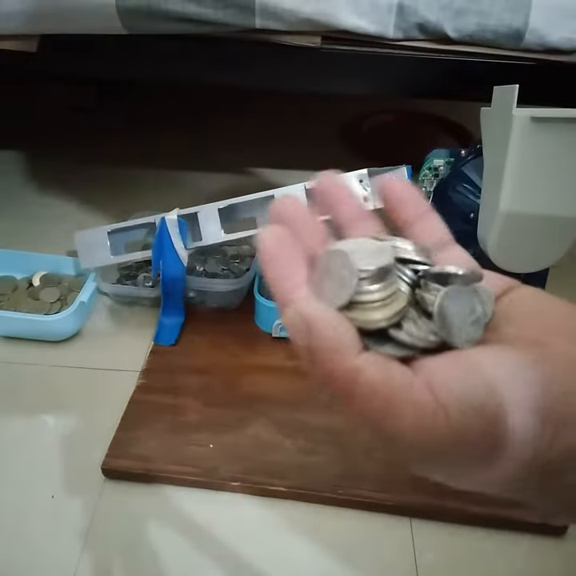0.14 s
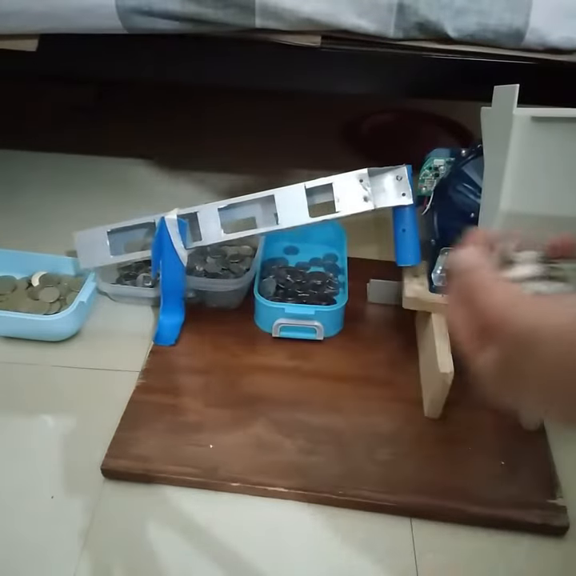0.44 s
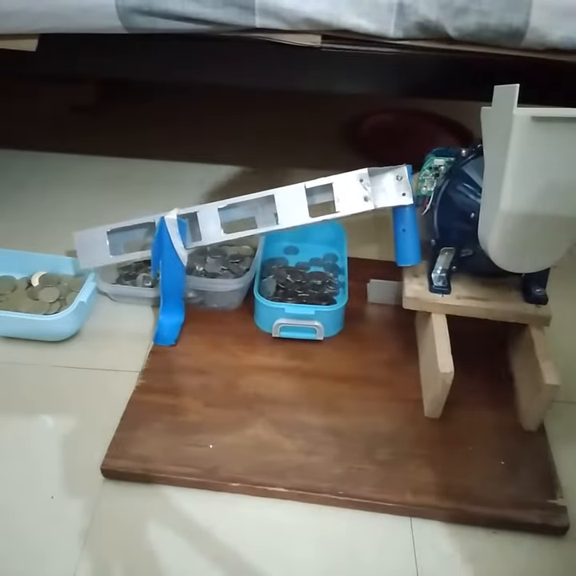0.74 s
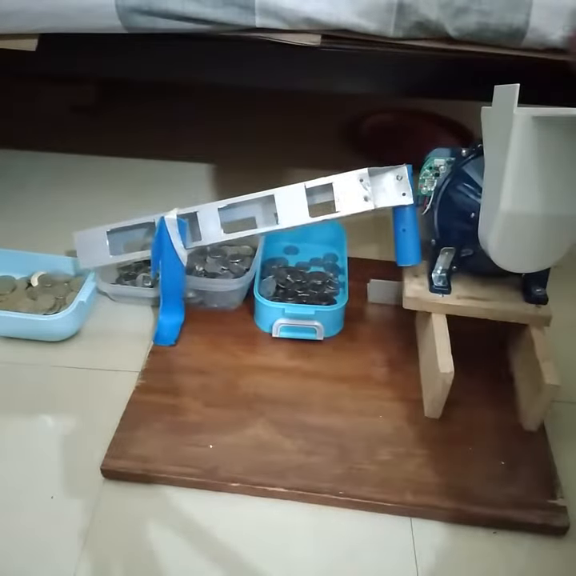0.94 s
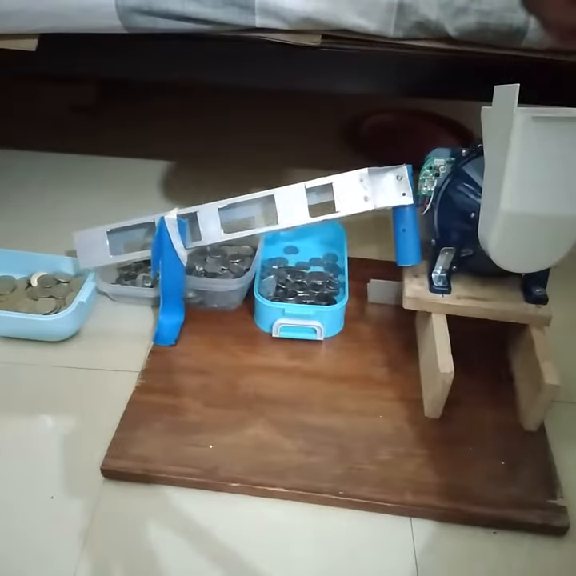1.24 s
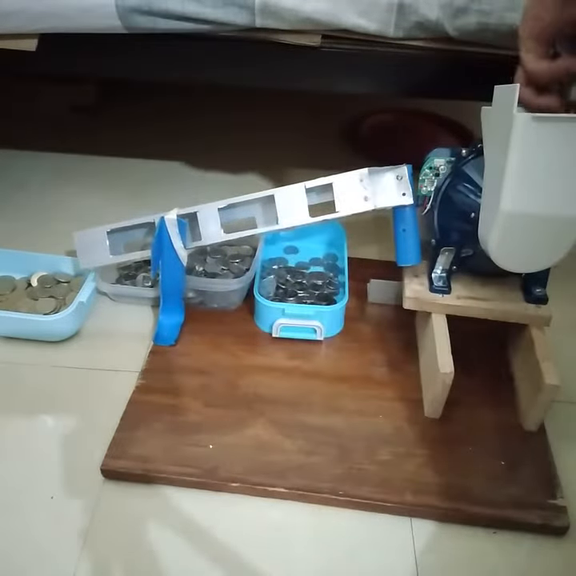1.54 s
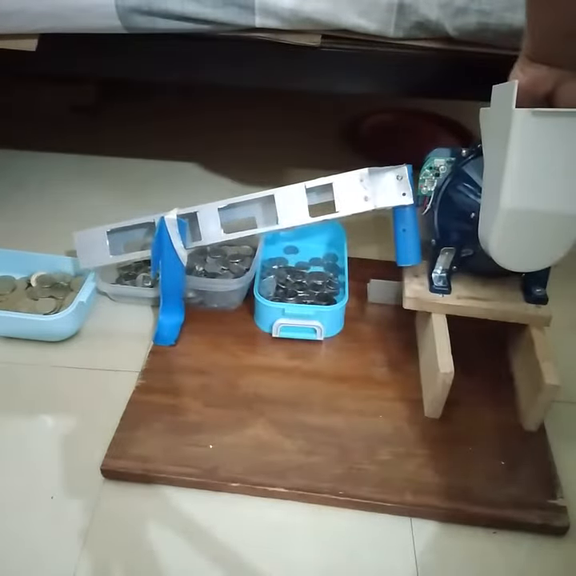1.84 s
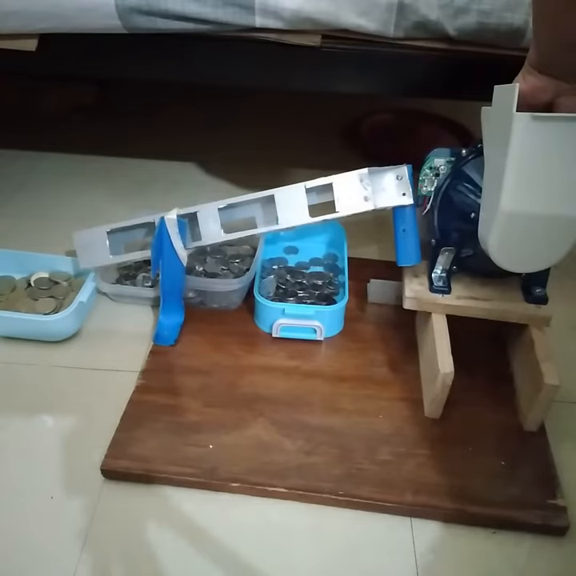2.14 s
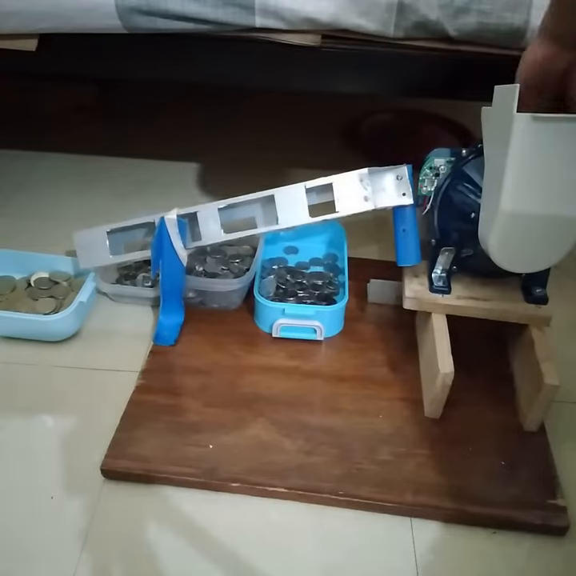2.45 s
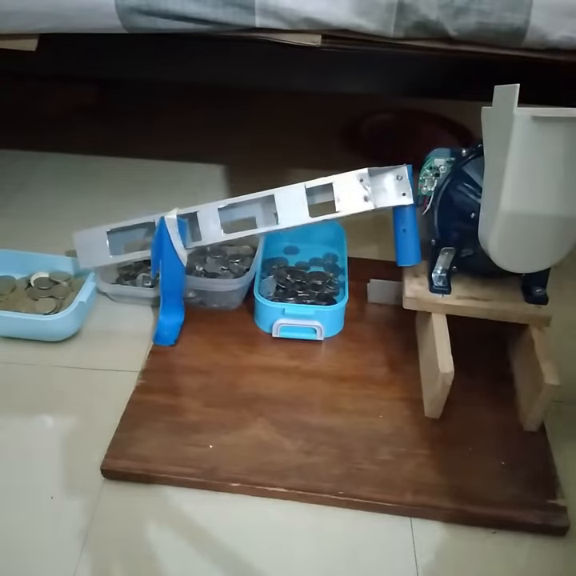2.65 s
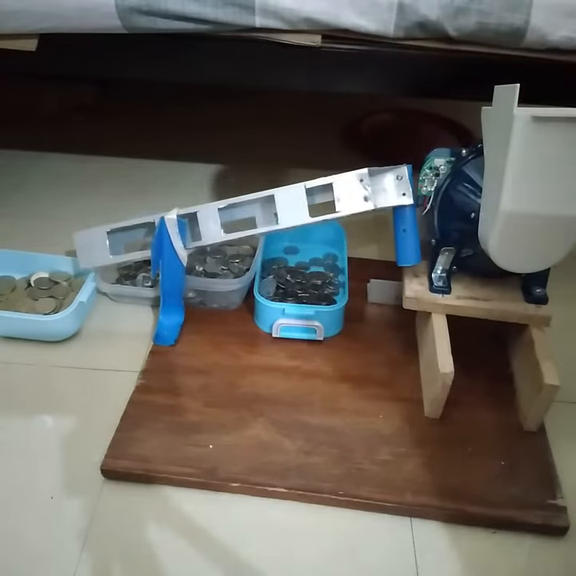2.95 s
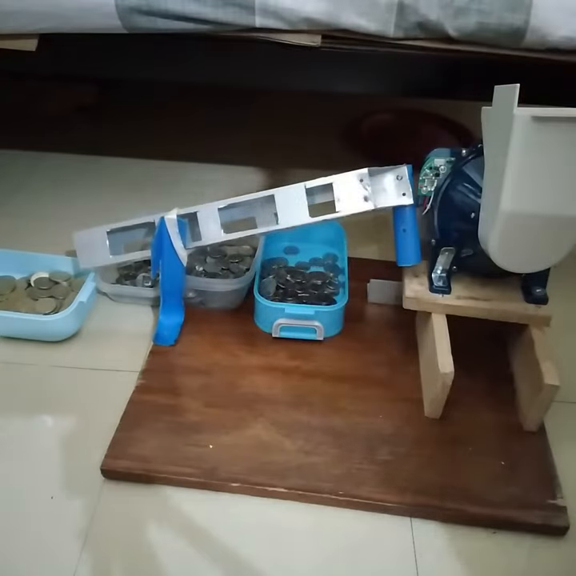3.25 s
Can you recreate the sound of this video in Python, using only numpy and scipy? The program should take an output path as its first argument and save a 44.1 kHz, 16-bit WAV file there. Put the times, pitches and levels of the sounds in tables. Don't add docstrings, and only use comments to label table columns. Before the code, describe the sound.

A motorised coin sorter clatters: coins tumble on its turning disc, knocking the plastic housing irregularly, busiest around 0.6-1.0 s, while a handful chinks brightly in a palm at about 0.8. Sparser clacks continue to 1.7. From 1.9 coins pour into the hopper, booming hollow at first, surging near 2.2 and again about 3.05, harshly clipped with rumble, ringing metal above a faint wavering gear whir, slight tiled-room echo.

```python
import sys
import numpy as np
from scipy import signal
from scipy.fft import rfft, irfft, next_fast_len
from scipy.io import wavfile
from scipy.ndimage import uniform_filter1d, map_coordinates

SR = 44100
rng = np.random.default_rng(int(sys.argv[2]) if len(sys.argv) > 2 else 0)


def attenuation_scalar(level_db):
    decades = np.asarray(level_db, float) / 20
    return 10 ** decades


def digitize_waveform(pressure):
    field = np.atleast_2d(pressure).T
    bounded = np.clip(field, -1, 1)
    quanta = np.round(bounded * 32767).astype(np.int16)
    wavfile.write(sys.argv[1], SR, quanta)


N = 149499
WIDE = 2 * next_fast_len(N // 2 + 4096)

# (frequency [Hz], level per Hz [dB])
METAL = [(1200, -30.5), (2000, -5), (3400, -0.5), (7700, -8.5), (11000, -13.5), (12500, -16), (15700, -37)]
# (frequency [Hz], width [Hz], level over the spectrum [dB])
COINS = [(4590, 610, 5), (7450, 1150, 6), (10380, 210, 9.5), (13500, 470, -5), (15300, 330, 12)]


def unit(x):
    return x / np.sqrt(np.mean(x ** 2) + 1e-20)


def along(points, hz):
    f, v = np.transpose(points)
    return np.interp(np.log(hz + 1), np.log(f + 1), v)


def curve(rows, before=None, after=None):
    times, values = np.transpose(rows)
    return np.interp(np.arange(N) / SR, times, values, before, after)


def wobble(rate):
    knots = rng.standard_normal(int(N * rate / SR) + 4)
    return map_coordinates(knots, [np.arange(N) * rate / SR])


def coloured(x, spectrum, peaks=()):
    hz = np.fft.rfftfreq(WIDE, 1 / SR)
    gain = attenuation_scalar(np.clip(along(spectrum, hz), -90, 20))
    for centre, width, db in peaks:
        gain = gain * np.sqrt(1 + (attenuation_scalar(2 * db) - 1) / (1 + ((hz - centre) * 2 / width) ** 2))
    cepstrum = irfft(np.log(unit(gain)), WIDE)
    cepstrum[1:WIDE // 2] *= 2
    cepstrum[WIDE // 2 + 1:] = 0
    return irfft(rfft(x, WIDE) * np.exp(rfft(cepstrum)), WIDE)[..., :N]


def pair():
    # (frequency [Hz], left-right likeness)
    alike = [(60, 0.81), (500, 0.74), (1500, 0.65), (4000, 0.012)]
    likeness = along(alike, np.fft.rfftfreq(WIDE, 1 / SR))
    turn = np.arccos(np.clip(likeness, -1, 1)) / 2
    mid, side = rfft(rng.standard_normal((2, WIDE))) * [np.cos(turn), np.sin(turn)]
    return irfft(np.array([mid + side, mid - side]), WIDE)[:, :N]


def bursts(times, dbs, ms, rise_ms=0.013):
    at = np.clip(np.asarray(times) * SR, 0, N - 1).astype(int)
    power = np.bincount(at, attenuation_scalar(2 * np.asarray(dbs)), N)
    keep = np.exp(-1000 / (abs(rise_ms) * SR))
    power = signal.lfilter([1 - keep], [1, -keep], power)
    power = signal.lfilter([1], [1, -np.exp(-2000 / (ms * SR))], power)
    return np.sqrt(np.abs(power)) * pair()


def rattle(per_s, spread_db, ms, count):
    draw = rng.random((count, 2))
    times = np.cumsum(-np.log(1 - draw[:, 0])) / per_s
    size_db = np.minimum(-spread_db * np.log(1 - draw[:, 1]), 8)
    inside = times < N / SR
    return unit(bursts(times[inside], size_db[inside], ms))


def damped(times, hz, t60, gains, size):
    t = np.arange(size) / SR
    decay = attenuation_scalar(-60 * t / np.reshape(t60, (-1, 1)))
    wave = np.sin(2 * np.pi * np.outer(hz, t)) * decay * (1 - np.exp(-t / 0.00059))
    at = (np.asarray(times) * SR).astype(int)[:, None] + np.arange(size)
    return np.array([np.bincount(at.ravel(), (wave * g[:, None]).ravel(), N + size)[:N] for g in gains])


def rings(count):
    draw, side = rng.random((count, 3)), rng.standard_normal((count, 2))
    times = np.cumsum(-np.log(1 - draw[:, 0])) / 1200
    hz = 500 + 15000 * draw[:, 1] ** 1.6
    t60 = np.minimum(70 / hz, .05)
    placed = (attenuation_scalar(2.5 * draw[:, 2])[:, None] * (side + [.8, .8])).T
    whitening = np.sqrt(hz) * (hz - 400) ** 0.48
    gains = placed * (times < N / SR) * whitening
    return unit(damped(np.minimum(times, N / SR), hz, t60, gains, size=400))


def blows(rows, spectrum, peaks, trim_db=0):
    s, db, metal_db = np.transpose(rows)[:3]
    knock = coloured(bursts(s, db - 5 + trim_db, ms=6.3, rise_ms=.8), spectrum, peaks)
    chink = coloured(bursts(s, db + metal_db - 4.5, ms=13.7), METAL, COINS)
    return knock + chink


def room(x):
    # (frequency [Hz], t60 [s])
    reverb_t60 = [(200, 0.49), (2000, 0.56), (12000, 0.18)]
    hz, t, z = signal.stft(rng.standard_normal((2, SR // 2)), SR, nperseg=256)
    tail = signal.istft(z * attenuation_scalar(-60 * t / along(reverb_t60, hz)[:, None]), SR, nperseg=256)[1]
    delayed = np.pad(x, ((0, 0), (250, 0)))
    return signal.fftconvolve(delayed, tail / np.linalg.norm(tail[0]), axes=1)[:, :N]


def shimmer(x):
    # (frequency [Hz], scatter [dB])
    scatter = [(10000, 1.5), (13000, 4)]
    hz, _, z = signal.stft(x, SR, nperseg=512)
    field = uniform_filter1d(rng.standard_normal(z.shape[1:]), size=6, axis=0)
    field = uniform_filter1d(field, size=9, axis=1)
    return signal.istft(z * attenuation_scalar(along(scatter, hz)[:, None] * unit(field)), SR, nperseg=512)[1][:, :N]


def motor():
    # (multiple of the tooth rate, level under load [dB])
    gear = [(1, -40), (1.57, -42), (2, -45), (3, -35), (5, -38)]
    # (time [s], level [dB])
    load = [
        (1.8, -11),
        (2.4, 0),
    ]
    # (frequency [Hz], level per Hz [dB])
    hum = [(12, -24), (20, -4.5), (144, -16), (811, -8.5), (2030, 3), (2270, 0), (6020, -23), (6910, -11),
           (15500, -30)]
    # (frequency [Hz], width [Hz], level [dB])
    stand = [(346, 5.5, 7)]
    gear_hz, waver, flutter_hz = 409.1, .003, 18
    phase = 2 * np.pi * np.cumsum(gear_hz * (1 + waver * wobble(29.9))) / SR
    tones = 0
    for multiple, db in gear:
        flutter = 1 + .5 * wobble(flutter_hz)
        tones = tones + attenuation_scalar(db) * flutter * np.sin(multiple * phase + rng.uniform(0, 1.02, (2, 1)))
    return attenuation_scalar(curve(load)) * tones + attenuation_scalar(-30 + wobble(7.56)) * coloured(pair(), hum, stand)


def free_coins():
    # (time [s], frequency [Hz], level [dB], t60 [s])
    ringing = [
        (.815, 13500, -21, 0.38),
        (0.935, 13340, -35, 0.36),
        (1.032, 4770, -20.5, .09),
        (1.812, 13600, -27, 0.33),
        (1.96, 15000, -32, 0.55),
        (2.2, 13500, -25, 1),
        (3.062, 7500, -33, .4),
        (3.1, 13200, -24, 1),
    ]
    s, hz, db, t60 = np.transpose(ringing)
    chatter_hz = 1000
    notes = damped(s, hz, t60, [attenuation_scalar(db), attenuation_scalar(db - 7.0)], size=16000)
    return notes * [wobble(chatter_hz), wobble(chatter_hz)]


def palm():
    # (time [s], level [dB])
    shifting = [
        (.4, -37),
        (.55, -28.5),
        (.7, -49),
        (.8, -26),
        (.815, -22.5),
        (.85, -29),
        (.89, -31.5),
        (.96, -30),
        (1.07, -82),
    ]
    return coloured(attenuation_scalar(curve(shifting, -82, -113)) * rattle(250, 2.1, 16, count=2000), METAL, COINS)


def disc():
    # (time [s], level [dB])
    tumble = [(0, -23), (.15, -27), (.4, -30), (.6, -22), (.85, -27.5), (.9, -35), (.97, -27),
              (1.08, -30.5), (1.45, -26), (1.7, -28), (1.75, -45)]
    # (time [s], peak [dB], metal over plastic [dB], housing note [Hz])
    knocks = [(.02, -11, -25, 1610), (.0595, -19, -22, 1635), (.095, -11, -18, 1590),
              (0.1398, -20, 0.5, 1740), (.3167, -15.5, -28, 2040), (0.41, -19, -18, 1657),
              (0.5082, -12.5, -18, 1790), (0.543, -18, 1.5, 1780), (.5793, -16, -10, 1033),
              (.586, -24, -20, 587), (0.6368, -7.5, -10, 1790), (0.6502, -14, -18, 1790),
              (0.6779, -15, -5, 1810), (.7058, -16, -10, 2050), (0.7209, -8.5, -12, 1826),
              (.7341, -15, -18, 1810), (0.7509, -7, -7.5, 1840), (.753, -15.5, -20, 956),
              (0.7637, -11, -8, 1626), (.788, -17, 1.5, 1760), (.838, -16, -6, 1920),
              (.848, -15, -14, 1860), (.9204, -16, -13, 1764), (0.936, -7.5, -10.5, 1710),
              (0.9492, -14, -14, 1880), (.97, -13, -16, 1610), (1.0346, -25.5, 0, 1630),
              (1.195, -18.5, -9, 1820), (1.2272, -14.5, -20, 1900), (1.2594, -19, -11, 1820),
              (1.2668, -15.5, -11, 1774), (1.2852, -17, -18, 1790), (1.3364, -22.5, -22, 1750),
              (1.39, -16, -14, 1860), (1.414, -17, -14, 1620), (1.4397, -10.5, -18, 1830),
              (1.465, -10, -11.5, 1610), (1.51, -21, -15, 1120), (1.535, -16, -16, 1790),
              (1.597, -23, -6, 1570), (1.6291, -17, -9, 1730), (1.6417, -10.5, -9, 1802),
              (1.657, -12, -19, 1790), (1.6872, -9, -17.5, 1830), (1.707, -16, -20, 1805)]
    # (frequency [Hz], level per Hz [dB])
    body = [(88, -68), (150, -67), (490, -8), (643, -7.5), (1000, -6), (1800, 2), (2270, -7), (4750, -10.5),
            (15500, -31.5)]
    # (frequency [Hz], width [Hz], level over the body [dB])
    housing = [(1345, 30, 8.5), (1610, 17, 8.5), (1790, 22, 8.5), (1860, 39, 3.5), (2050, 38, 9.5),
               (4800, 550, 7.5), (10850, 220, 12)]
    level = attenuation_scalar(curve(tumble, after=-47) - 1.0 + 1.3 * wobble(22.13))
    tumbling = coloured(level * rattle(per_s=260, spread_db=3, ms=11, count=2000), body, housing)
    s, db, metal_db, hz = np.transpose(knocks)
    housing_notes = damped(s, hz, .045, [attenuation_scalar(db - 2)] * 2, size=3000)
    coin_hz = 4750 * np.exp(.1 * rng.standard_normal(len(s)))
    coin_notes = damped(s, coin_hz, .09, [attenuation_scalar(db + metal_db - 5)] * 2, size=3000)
    return tumbling + blows(knocks, body, housing, trim_db=-7) + housing_notes + coin_notes


def hopper():
    # (time [s], level [dB])
    pour = [(1.909, -22.5), (2.02, -13), (2.12, -11), (2.35, -10.5), (2.4, -16), (2.48, -14), (2.56, -19),
            (2.67, -14.5), (2.77, -21.5), (2.82, -11.5), (2.87, -18.5), (2.97, -13.5), (3.01, -15.5),
            (3.1, -12.5), (3.21, -14.5), (3.27, -11.5), (3.39, -20.5)]
    # (time [s], level [dB])
    heaping = [(1.91, 7.5), (2.05, -5), (2.2, 4), (2.3, 1.5), (2.45, 4.5), (2.6, -3), (2.8, 2), (2.95, 1),
               (3.06, 4.5), (3.15, 2.5), (3.27, 3), (3.39, 4)]
    # (time [s], peak [dB], metal over plastic [dB], wall note [Hz])
    drops = [(1.783, -16, 1, 1860), (1.79, -21, -8, 2600), (1.796, -17, -2, 1690),
             (1.806, -13.5, -6.5, 1095), (1.814, -20, -4, 2400), (1.848, -21.5, -10, 1150),
             (1.872, -24.5, 0, 2430), (1.908, -29.5, 19, 1630), (1.943, -11.5, -6, 997),
             (1.959, -9.5, -7, 3770), (2.025, -11, -8, 1050), (2.04, -10, 1.5, 1280),
             (2.079, -7, -23, 1405), (2.109, -9.5, -23, 970), (2.134, -6.5, -10, 990),
             (2.175, -5.5, -16, 1080), (2.43, -8.5, -6, 1700), (2.475, -9, -6, 1990),
             (2.664, -13, -12, 2300), (2.724, -12, -8, 3500), (2.799, -9.5, -6, 2490),
             (2.822, -10, -14, 2050), (2.964, -4.5, -8, 3260), (2.985, -8, -15, 2040),
             (3.025, -3.5, -28, 922), (3.043, -10, -14, 1680), (3.245, -12, -3, 1960)]
    # (frequency [Hz], level per Hz [dB])
    heap_body = [(150, -19), (330, -10.5), (800, -2.5), (2000, 2.5), (7400, -9.5), (11500, -23),
                 (12600, -28.5), (15700, -30)]
    # (frequency [Hz], width [Hz], level over the body [dB])
    walls = [(629, 32, 6.5), (1620, 35, 1.5), (3240, 67, 4.5), (12900, 950, 7.5), (14800, 520, 14)]
    # (frequency [Hz], level per Hz [dB])
    hollow = [(700, -32), (980, 3), (1300, -6), (2000, -53)]
    level = attenuation_scalar(curve(pour, before=-90) - 5.5 + 0.41 * wobble(27.8))
    stream = rattle(per_s=800, spread_db=2, ms=5, count=4000) + attenuation_scalar(-5) * rings(count=4300)
    heap = coloured(level * attenuation_scalar(curve(heaping)) * rattle(500, 1.1, 24, count=3000), METAL, COINS)
    s, db, _, hz = np.transpose(drops)
    notes = damped(s, hz, .05, [attenuation_scalar(db - 6.5)] * 2, size=3000)
    hollow_db = -8.5 - 60 * np.maximum(np.arange(N) / SR - 2.17, 0)
    boom = coloured(level * attenuation_scalar(hollow_db) * rattle(60, 2.1, 2.9, count=400), hollow)
    beating = coloured(level * stream, heap_body, walls)
    return boom + beating + attenuation_scalar(-5) * heap + blows(drops, heap_body, walls) + notes


def scene():
    coins = free_coins() + palm() + disc() + hopper()
    wet_db = -8
    return motor() + shimmer(attenuation_scalar(0.62) * (coins + attenuation_scalar(wet_db) * room(coins)))


def low_pass(x):
    return signal.sosfilt(signal.butter(12, 15650, fs=SR, output="sos"), x)


def record(dry):
    # (frequency [Hz], left minus right [dB])
    lean_db = [(130, -0.5), (300, 3), (1000, -1), (2500, 1), (5000, 2), (7500, 11), (9500, -10.5),
               (14000, -7.5)]
    # (time [s], level [dB])
    overload = [(2.0, -48), (2.1, -33), (2.3, -23.5), (2.45, -35), (2.52, -57), (2.85, -48), (3.035, -29),
                (3.05, -18.5), (3.12, -24), (3.32, -23.5), (3.39, -58)]
    # (frequency [Hz], level per Hz [dB])
    rumble = [(8.8, -45), (15, -10), (43, -12.5), (206, -11.5), (246, -13), (700, -14), (910, -32),
              (1540, -120)]
    # (time [s], offset [full scale])
    drift = [
        (2.15, 0),
        (2.38, .11),
        (2.47, 0),
        (3.041, 0),
        (3.053, -.3),
        (3.075, -.2),
        (3.11, .1),
        (3.3, .1),
        (3.39, -.03),
    ]
    hz = np.fft.rfftfreq(WIDE, 1 / SR)
    left_leads_s = .0001
    lean = attenuation_scalar(along(lean_db, hz) / 2) * np.exp(1j * np.pi * hz * left_leads_s)
    x = irfft(rfft(dry, WIDE) * [lean, 1 / lean], WIDE)[:, :N]
    lumps = attenuation_scalar(curve(overload, before=-90) + 2.5 * wobble(25.22) + [[3], [-3]])
    x = x + lumps * coloured(rng.standard_normal((2, N)), rumble)
    x = x + uniform_filter1d(curve(drift), size=300) * [[1], [.25]]
    ceiling = 1.05
    clipped = x / (1 + np.abs(x / ceiling) ** 6) ** (1 / 6)
    return low_pass(clipped)


dry = scene()
out = record(dry)
digitize_waveform(out)
```